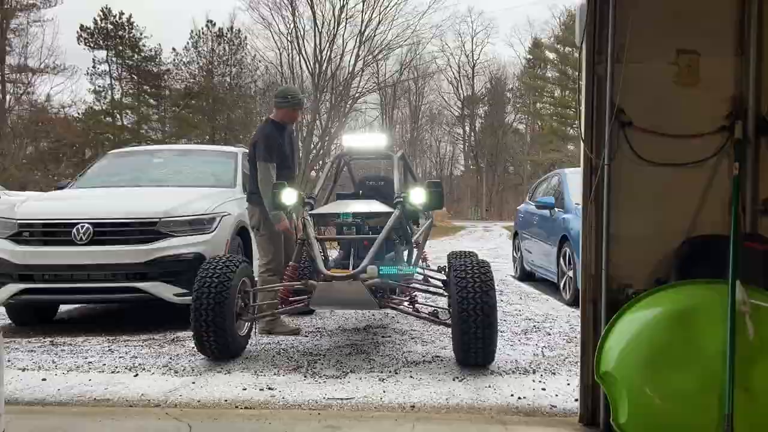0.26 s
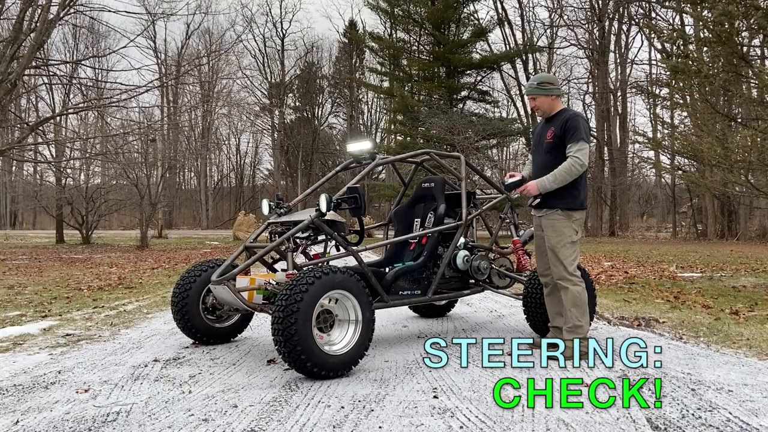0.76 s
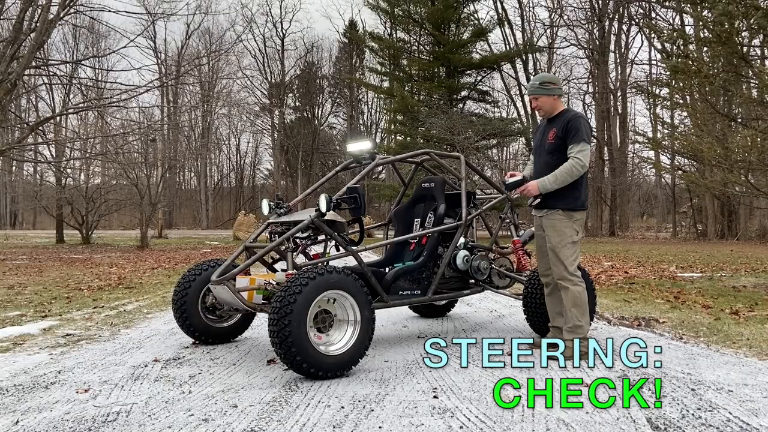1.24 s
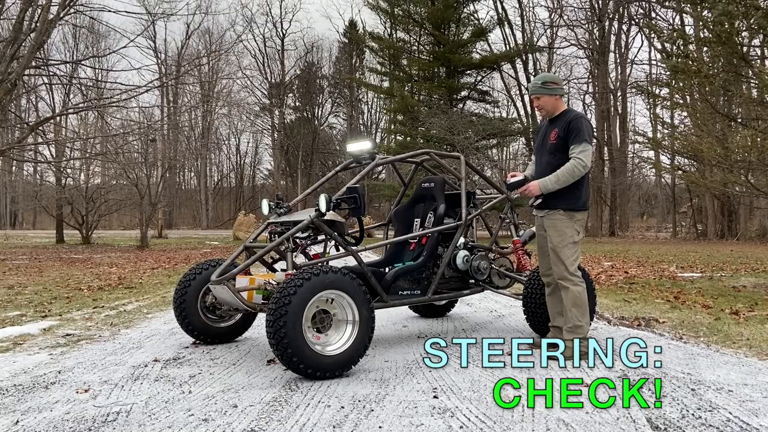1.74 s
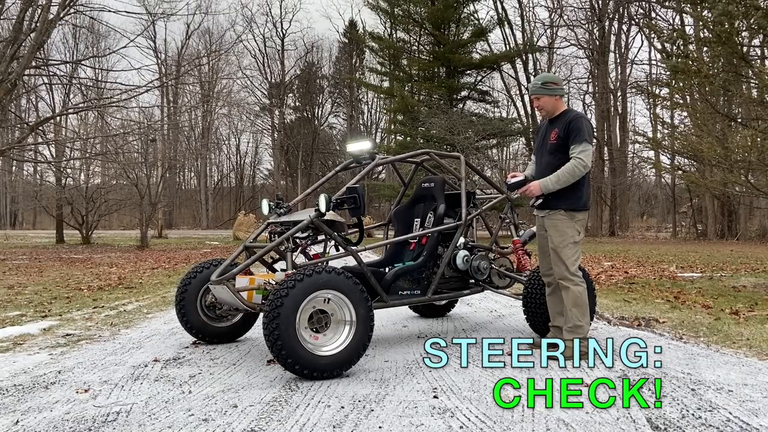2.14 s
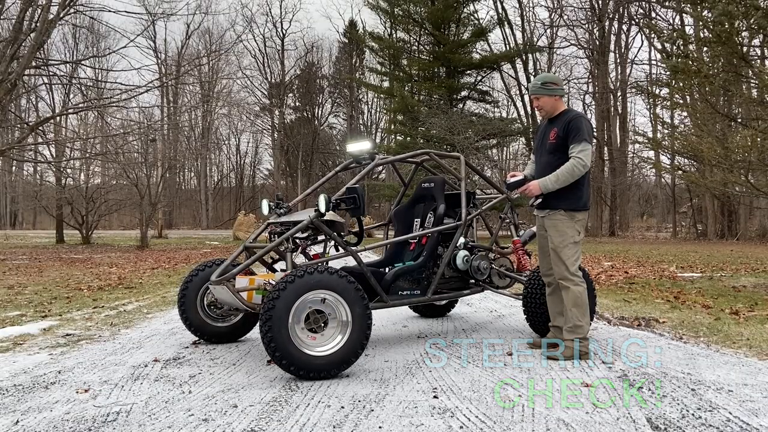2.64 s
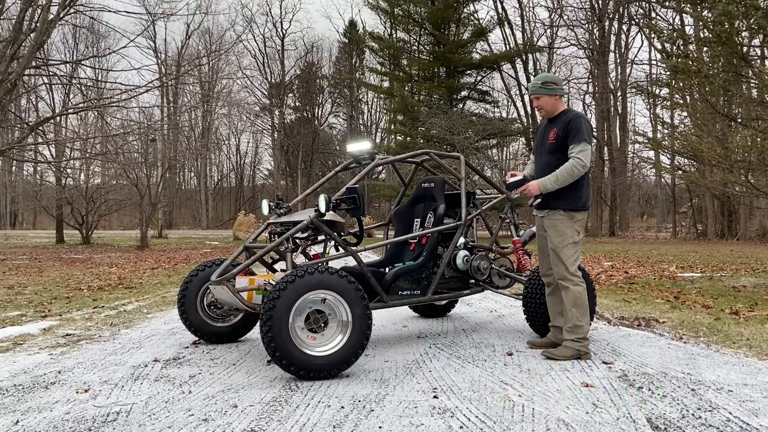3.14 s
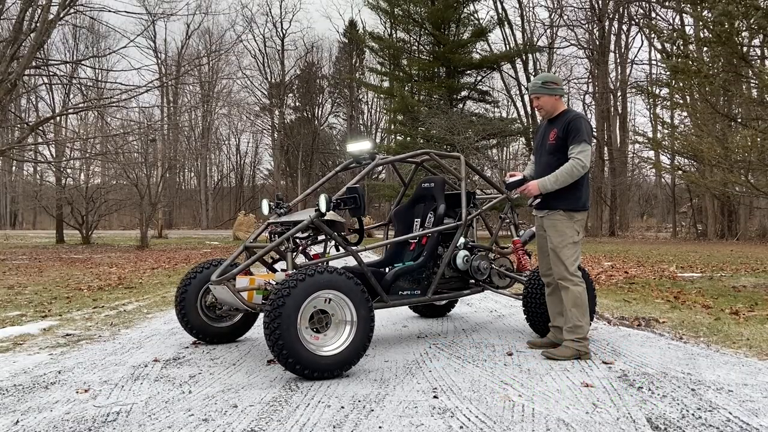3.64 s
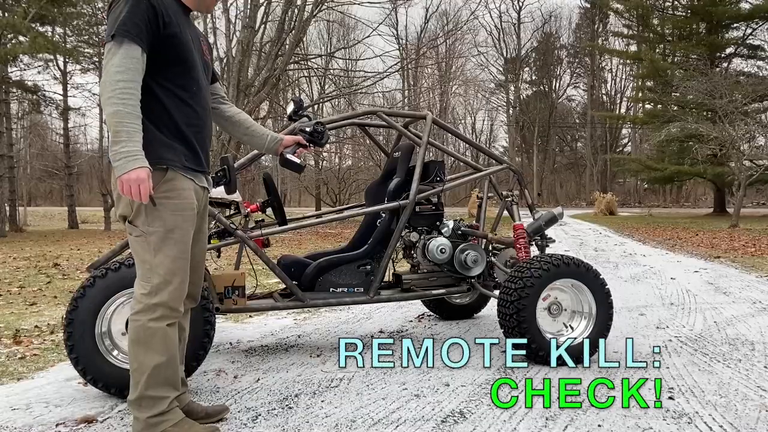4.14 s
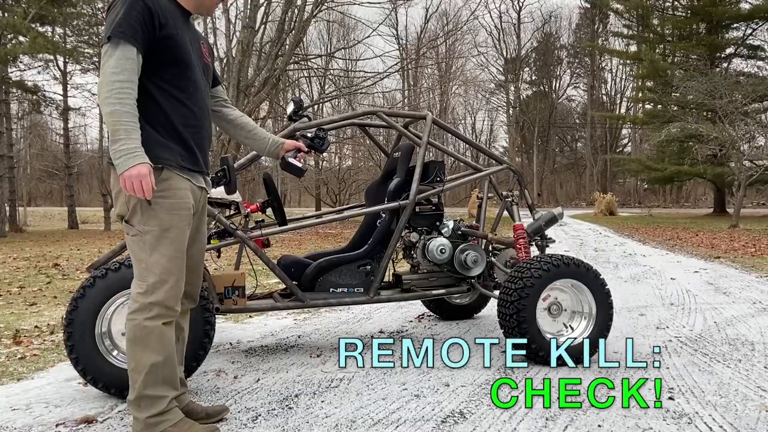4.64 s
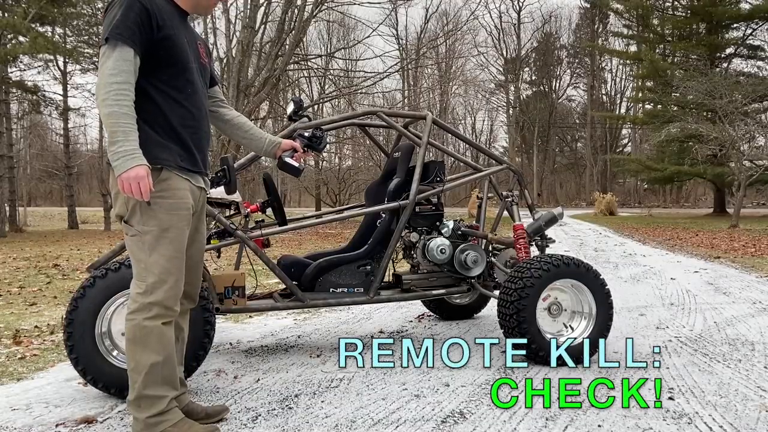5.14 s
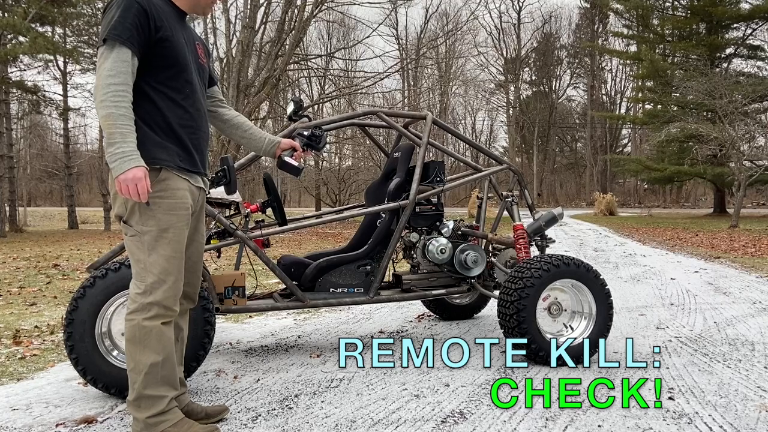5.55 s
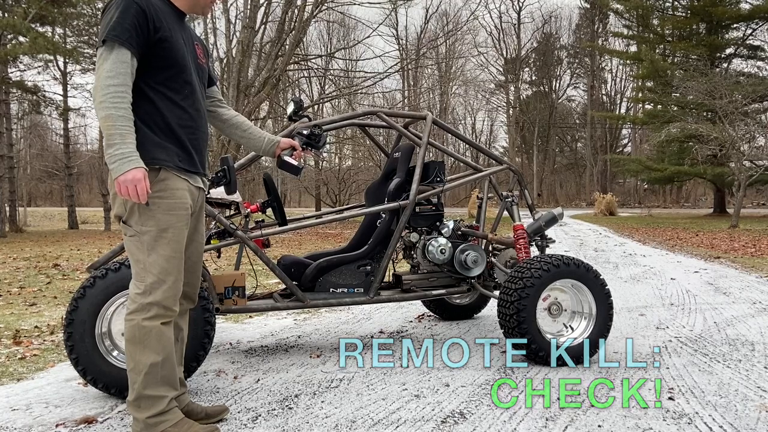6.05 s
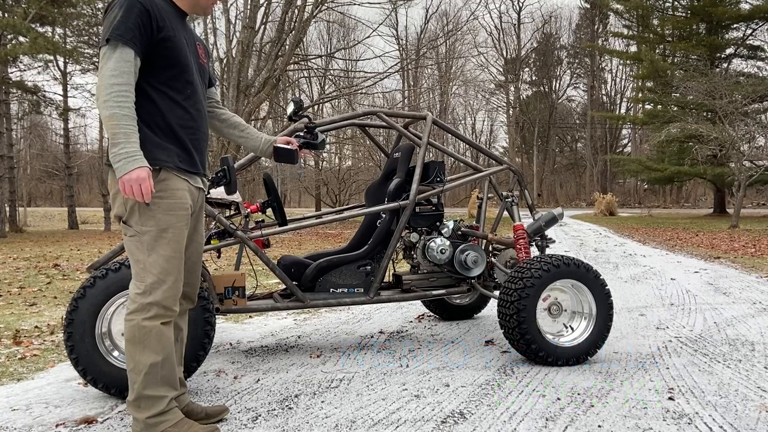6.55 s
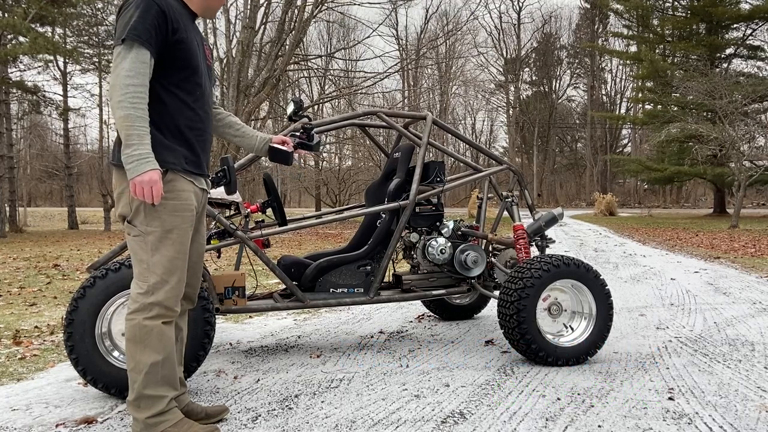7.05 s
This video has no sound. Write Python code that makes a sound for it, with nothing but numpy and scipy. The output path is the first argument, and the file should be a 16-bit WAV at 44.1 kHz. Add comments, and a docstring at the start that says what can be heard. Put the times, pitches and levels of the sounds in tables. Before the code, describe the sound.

Outdoors on a driveway, a small single-cylinder buggy engine idles evenly, low muffled exhaust thumps over ticking valves and fan whir. Thin, wavering electric whines come and go as the wheels are steered. Abruptly the view is nearer and wind rumbles and flutters heavily on the stereo microphone. The ignition is cut; the engine chuffs ever slower with airy bursts and metallic clacks, sighs faintly and stops, leaving popping gusts.

```python
"""Outdoors, a single-cylinder four-stroke buggy idles: each firing thumps through silencer resonances, short
rings make the valve clatter, shaped noise the whir and hiss of the fan, wavering partials the steering motor.
The scene cuts to a nearer, windy place: rumble, flutter and popping eddies buffet two microphone ports.
The ignition is cut and the engine chuffs ever slower to a halt, in bursts of resonant noise and clacks."""
import sys
import numpy as np
from scipy import signal
from scipy.fft import rfft, irfft
from scipy.io import wavfile
from scipy.ndimage import uniform_filter1d

SR = 44100
rng = np.random.default_rng(int(sys.argv[2]) if len(sys.argv) > 2 else 0)


def dump_mix(stems):
    """Bounce the given channels to the path in sys.argv[1] as a 16-bit WAV at rate SR."""
    frames = np.atleast_2d(stems).T  # one column per channel
    limited = np.clip(frames, -1, 1)  # hard clip at full scale
    pcm = np.round(limited * 32767).astype(np.int16)
    wavfile.write(sys.argv[1], SR, pcm)


N = 321489
TIME = np.arange(N) / SR
FREQ = np.maximum(np.arange(N // 2 + 1) * SR / N, 1)


def undb(db):
    """Gain of a level in dB."""
    return 10 ** (np.asarray(db) / 20)


def unit(x):
    """Scale to rms 1."""
    return x / np.sqrt(np.mean(x ** 2))


def curves(table):
    """Columns of a table, joined in time by straight lines."""
    time_s, *columns = np.transpose(table)
    return [np.interp(TIME, time_s, column) for column in columns]


def colour(x, points):
    """Shape a spectrum by (hz, db) points; outside them it falls 17.2 dB an octave."""
    hz, db = np.transpose(points)
    octaves_below = np.maximum(np.log2(hz[0] / FREQ), 0)
    octaves_above = np.maximum(np.log2(FREQ / hz[-1]), 0)
    shape_db = np.interp(np.log(FREQ), np.log(hz), db) - 17.2 * (octaves_below + octaves_above)
    return irfft(rfft(x) * undb(shape_db), N)


def ring(x, modes):
    """Pass a sound through a sum of resonances that alternate in sign."""
    response = 0
    for k, (hz, width_hz, db) in enumerate(modes):
        detuning = (FREQ ** 2 - hz ** 2) / (FREQ * width_hz)
        response = response + (-1) ** k * undb(db) / (1 + 1j * detuning)
    return irfft(rfft(x) * response, N)


def walk(rate):
    """Random levels held for 1 / rate s and smoothed twice; spread near 1."""
    hold = int(SR / rate)
    steps = np.repeat(rng.standard_normal(N // hold + 1), hold)
    return 1.1204 * uniform_filter1d(uniform_filter1d(steps, hold), hold)[:N]


def eddies(points, shared, lumpy_db, rate):
    """Turbulence in lumps: a share of the power is common to both ports, the rest is each port's own."""
    common, left, right = (colour(rng.standard_normal(N) * undb(lumpy_db * walk(rate)), points)
                           for _ in range(3))
    shared = np.clip(shared, 0, 1)
    return unit(np.sqrt(shared) * common + np.sqrt(1 - shared) * np.array([left, right]))


# Spectrum of the quiet air: pitch_hz, relative_density_db
AIR_SPECTRUM = [(40, -7), (65, -4), (180, 2), (600, -20.5), (950, -22.5), (1500, -26.5), (2500, -31.5),
                (3300, -39.5), (9000, -66.5)]
AIR_DB = -34  # rms


def quiet_air():
    """A faint bed of nearly steady noise, almost independent at the two ports."""
    return undb(AIR_DB) * eddies(AIR_SPECTRUM, 0.067, 0.5, 7.6)


# Wind on the ports, from its first row on: time_s, rumble_db, flutter_db
WIND_LEVELS = [(3.82, -18, -41), (3.9, -13.5, -22), (4.25, -11, -18.5), (4.55, -15, -21.5),
               (5.17, -13.5, -22), (5.25, -30, -24.5), (5.47, -37, -33), (5.6, -28.5, -25),
               (5.79, -30, -28), (5.85, -22, -21.5), (6.22, -26, -28), (6.45, -27.5, -34), (6.58, -40, -40),
               (6.63, -28, -20.5), (6.71, -36.5, -53), (6.79, -35, -15), (6.9, -32, -54), (7.0, -50, -60),
               (7.08, -35, -36), (7.19, -44, -45), (7.29, -48, -66)]
# Spectrum of the rumble: pitch_hz, relative_density_db
RUMBLE_SPECTRUM = [(25, -32), (45, -5), (65, -1), (110, -5), (200, -19), (300, -20.5)]
# Spectrum of the flutter: pitch_hz, relative_density_db
FLUTTER_SPECTRUM = [(120, 3), (220, 1), (400, -2), (700, -12), (1100, -23), (1600, -30)]
# Loudest eddies, sharp pops and slow thuds: start_s, level_db, pitch_hz, left_minus_right_db
LOUD_POPS = [(3.944, -10, 324, -10), (4.035, -7, 440, -12.5), (4.163, -5, 260, -5.5), (4.334, -3, 400, -4),
             (4.426, 0.5, 288, -2), (4.643, -4.5, 236, -7), (4.84, -8, 245, -15), (4.902, -9.5, 375, -18),
             (5.044, -9.5, 365, -13), (5.201, -6.5, 279, -1), (5.418, -15, 330, -2), (5.516, -14, 242, -6),
             (5.553, -16, 108, 2.5), (5.557, -19, 270, 0.0), (5.686, -8.5, 264, -3.0),
             (5.689, -11, 104, -2), (5.769, -14, 304, -2), (5.829, -10.5, 282, -9), (5.831, -8.5, 91, -1.0),
             (5.904, -15, 345, -5), (5.958, -6.5, 450, -7), (6.077, -10, 113, 5), (6.084, -11, 262, -1.0),
             (6.172, -9.5, 86, 4), (6.177, -14, 460, -1.0), (6.21, -8.5, 370, 5), (6.222, -9.5, 442, -9),
             (6.246, -6.5, 347, 4), (6.276, -17, 272, 2), (6.301, -9, 655, -9), (6.35, -13, 75, 1),
             (6.397, -13, 252, 7), (6.417, -9, 430, -8.5), (6.466, -24.5, 603, -1), (6.503, -22.5, 500, -6),
             (6.613, -12, 244, -2.5), (6.624, -18.5, 74, -1.5), (6.636, -6.5, 260, -3),
             (6.687, -11, 373, -8), (6.785, -20, 246, -4.0), (6.803, -17, 324, -6), (6.834, -25, 403, -9),
             (6.871, -26, 510, -11), (6.872, -27, 108, 6), (6.973, -21, 441, -4), (7.054, -18.5, 325, -7),
             (7.06, -15, 62, 3), (7.117, -13, 480, -9), (7.126, -9, 68.5, 1.5), (7.131, -11, 320, -6)]
GUSTY_DB, GUSTS_PER_S = 1.5, 12
# small random pops: most dB over the flutter, lowest Hz, octaves of spread, mean left minus right dB
SMALL_DB, SMALL_HZ, SMALL_OCTAVES, SMALL_PAN_DB = 10.5, 265, 1.3, -15


def wind():
    """Turbulent rumble and flutter follow the gusts; the strongest eddies pop as a cycle or two."""
    gusts_db = GUSTY_DB * np.array([walk(GUSTS_PER_S), walk(GUSTS_PER_S)])
    rumble_db, flutter_db = curves(WIND_LEVELS) + gusts_db
    out = undb(rumble_db) * eddies(RUMBLE_SPECTRUM, 0.78, 2.8, 25)
    out = out + undb(flutter_db) * eddies(FLUTTER_SPECTRUM, 0.43, 7.4, 150)
    onset_s = WIND_LEVELS[0][0]
    out = out * np.clip((TIME - onset_s) / 0.056, 0, 1)

    when, size, pitch, side = rng.random(size=(70, 4)).T
    small_s = onset_s + when * (TIME[-1] - onset_s)
    small_db = flutter_db[(small_s * SR).astype(int)] + SMALL_DB - 8 * size
    small_hz = SMALL_HZ * 2 ** (SMALL_OCTAVES * pitch)
    small_pops = list(zip(small_s, small_db, small_hz, 2 * SMALL_PAN_DB * side))
    for start_s, db, hz, pan_db in LOUD_POPS + small_pops:
        i = int(start_s * SR)
        turns = (TIME[i:i + SR // 10] - start_s) * hz
        body = (turns / 0.91 * np.exp(1 - turns / 0.75)) ** 2
        front = 0.3 * turns / 0.36 * np.exp(1 - turns / 0.32)  # higher and sharper
        pop = body * np.sin(2 * np.pi * turns) + front * np.sin(2 * np.pi * 1.93 * turns)
        out[:, i:i + len(pop)] -= undb(db + np.array([[pan_db], [-pan_db]]) / 2) * pop
    return out


# Steering motor, a row a turn of the wheels; pitches are of the second partial:
# start_s, length_s, start_hz, top_hz, end_hz, second_partial_db, third_partial_db
WHEEL_TURNS = [(0.169, .3, 2380, 2920, 2800, -55, -65), (0.911, .25, 2600, 2990, 3120, -49, -75),
               (1.659, 0.36, 2680, 2800, 2670, -51, -57), (2.082, .36, 2680, 2615, 2620, -48, -57.5),
               (2.48, 0.19, 2554, 2620, 2600, -51, -57.5), (3.55, .24, 3070, 3030, 3040, -55, -75)]
SPIN_UP_S, SPIN_UP_DB = 0.058, 3  # time to the top pitch; extra level at the start
WAVER_SHARE, WAVER_DB = .011, 5.5  # unsteadiness of pitch and of level


def steering_whine():
    """A thin, unsteady pair of partials: the motor strains as it spins up, then drifts under load."""
    out = 0
    for start_s, length_s, start_hz, top_hz, end_hz, second_db, third_db in WHEEL_TURNS:
        since = TIME - start_s
        hz = np.interp(since, [0, SPIN_UP_S, length_s], [start_hz, top_hz, end_hz])
        on = np.clip(np.minimum(since, length_s - since) / 0.012, 0, 1)
        phase = np.pi * np.cumsum(hz * (1 + WAVER_SHARE * walk(30))) / SR  # of the first partial
        strain_db = SPIN_UP_DB * np.exp(-(since / SPIN_UP_S) ** 2)
        for k, db in ((2, second_db), (3, third_db)):
            level = np.sqrt(2) * undb(db + strain_db + WAVER_DB * walk(30.13))
            out = out + on * level * np.sin(k * phase)
    return out


# Crank while the ignition is on, hunting a little; the scene cuts mid-cycle to a nearer, windy place:
# time_s, four_stroke_cycles_done
CRANK_TURNS = [(-.0539, 0), (.8858, 14), (1.4191, 22), (2.2225, 34), (2.8898, 44), (3.7643, 57),
               (3.7995, 58), (4.312, 66)]
# after the ignition cut: starting cycles/s, friction in cycles/s per s, drag as share of the speed per s
CUT_HZ, FRICTION, DRAG = 15.61, 3.4, .2788


def crank():
    """Times and cycles done: the idle, then friction and drag slow the crank after the ignition cut."""
    time_s, cycles = np.transpose(CRANK_TURNS)
    t = np.arange(1, 2900) / 1000
    done = (CUT_HZ + FRICTION / DRAG) * (1 - np.exp(-DRAG * t)) / DRAG - FRICTION / DRAG * t
    return np.append(time_s, time_s[-1] + t), np.append(cycles, cycles[-1] + done)


# Running gear: time_s, clatter_db, hiss_db
GEAR_LEVELS = [(0, -35, -48), (1.9, -34.5, -47), (3.78, -35, -47.5), (3.81, -32, -42.5), (4.3, -31, -43.5),
               (4.55, -35, -46), (5.55, -36, -45.5), (5.85, -41.5, -54), (6.45, -53, -62.5),
               (6.55, -60.5, -66.5), (6.85, -66, -61), (6.95, -72, -92)]
# Knocks that ring the block in every cycle: cycle_share, relative_db, pitch_hz, t60_s
VALVE_KNOCKS = [(0.22, 7.5, 675, 0.017), (0.32, 1, 657, 0.018), (0.91, -2, 590, 0.026),
                (0.171, 3, 1044, 0.018), (.28, -0.5, 1340, 0.016), (.63, -19.5, 1195, 0.023),
                (0.78, 0, 1312, 0.032), (0.19, 4.5, 1990, 0.015), (.24, 7, 1815, 0.014),
                (.3, 2.5, 1705, 0.032), (.65, -1, 1807, 0.063), (.75, -4, 1655, 0.044),
                (0.8, -2, 1760, 0.037), (0.87, 5.5, 1870, 0.012), (.21, -0.5, 2550, 0.028),
                (0.51, -3.5, 2060, 0.03), (.64, 0.5, 3100, 0.012), (0.66, -6.5, 3330, 0.034),
                (.63, -11.5, 2500, 0.035)]
# Knocks that stand out after the scene cut, by row of VALVE_KNOCKS: row, extra_db
NEARER_KNOCKS = {8: 2, 10: 8, 18: 13}
# Resonances of the block: pitch_hz, width_hz, relative_db
BLOCK_MODES = [(1085, 110, -7.5), (1390, 16.67, -2), (1716, 14, 4.5), (1853, 19, 1.5), (2517, 194, -8.5),
               (3412, 38, 1)]
# Spectrum of the whir: pitch_hz, relative_density_db
WHIR_SPECTRUM = [(450, 1.5), (900, -9), (1600, -1.5), (2500, -9), (3300, -12), (3700, -30)]
# Spectrum of the hiss: pitch_hz, relative_density_db
HISS_SPECTRUM = [(3700, 0.5), (5500, -1), (6900, 0), (8500, -5), (12000, -11.5), (15000, -9)]
# Puffs that lift the hiss in every cycle: cycle_share, over_hiss_db, fade_cycle_share
HISS_PUFFS = [(.905, 1.5, 0.091), (.13, -0.5, 0.078), (0.22, -1, 0.28), (0.23, -15, 0.36),
              (0.99, -21, 0.036)]
PULSE_DB, PULSE_SHARE = 1, 0.27  # the whir swells twice a cycle, first at this share


def gear():
    """Valve gear knocks at fixed points of the cycle in short rings; the fan whirs and hisses through."""
    clatter_db, hiss_db = curves(GEAR_LEVELS)
    time_s, cycles = crank()
    knocks, t = np.zeros(N + SR), np.arange(SR // 30) / SR
    scene_cut_s = CRANK_TURNS[-2][0]
    for row, (share, db, hz, t60) in enumerate(VALVE_KNOCKS):
        starts = np.interp(np.arange(86) + share, cycles, time_s)
        for start, (strong, sharp) in zip(starts, rng.standard_normal((86, 2))):
            i = int((start + .1) * SR)  # 0.1 s of lead-in, trimmed below
            knock_db = db + NEARER_KNOCKS.get(row, 0) * (start > scene_cut_s) + 2.0 * strong
            fall = undb(knock_db - 60 * t / t60) * np.clip(t / 0.0006, 0, 1)
            knocks[i:i + len(t)] += fall * np.sin(2 * np.pi * hz * (1 + 0.031 * sharp) * t)
    knocks = knocks[SR // 10:SR // 10 + N]

    done = np.interp(TIME, time_s, cycles)
    pulse_db = PULSE_DB * np.cos(4 * np.pi * (done - PULSE_SHARE))
    whir = rng.standard_normal(N) * undb(0.79 * walk(22) + pulse_db)
    clatter = unit(knocks) + undb(3.0) * unit(colour(whir, WHIR_SPECTRUM))
    clatter = clatter + undb(-7.5) * unit(ring(whir, BLOCK_MODES))

    lift = 1
    for share, db, fade in HISS_PUFFS:
        since = done - share + 1
        puff_levels = undb(db + 4.5 * rng.standard_normal(90))  # one a cycle
        lift = lift + puff_levels[since.astype(int)] * np.exp(-(since % 1) / fade)
    hiss = lift * colour(rng.standard_normal(N), HISS_SPECTRUM)
    return undb(clatter_db) * unit(clatter) + undb(hiss_db) * unit(hiss)


# Valves snapping as the engine runs down: start_s, air_burst_db, clack_over_burst_db
VALVE_SNAPS = [(4.3225, -39.5, 1), (4.374, -27.5, -7), (4.4411, -32.5, -4), (4.51, -33, -5),
               (4.58, -33.5, -5), (4.655, -33.5, -3), (4.7331, -34.5, -6), (4.7568, -44, 4),
               (4.8137, -34, -4), (4.899, -37, -12), (4.9682, -43.5, 17), (4.9896, -45, -8),
               (5.0637, -35.5, 6.5), (5.1633, -33, 8), (5.2737, -33, 4), (5.3893, -33, 4.5),
               (5.5149, -33, 4.5), (5.6174, -34, -2.5), (5.725, -57, 18), (5.7638, -44, -12),
               (5.831, -42.5, -7), (5.874, -56, 13), (5.9257, -44, 6), (5.9508, -39.5, 4), (6.005, -45, -7),
               (6.056, -61.5, 23), (6.116, -44, 3), (6.1434, -38.5, 3.5), (6.2126, -45.5, -12),
               (6.2764, -62, 21.5), (6.357, -44, 4), (6.3957, -44, 4.5), (6.595, -65, 23),
               (6.7268, -43, 4.5), (6.805, -47, 0)]
# Rings of the casing in each clack: pitch_hz, relative_db, t60_s
CLACK_RINGS = [(1105, 7, 0.057), (1468, 10, 0.032), (1930, 1, 0.062), (2950, 2, 0.054), (3260, 4, 0.027),
               (4770, -5, 0.043)]
# One longer ring of the casing: start_s, pitch_hz, level_db, t60_s
CASING_PING = (4.976, 2960, -28, .15)
# Long sighs of air past the slowing piston: start_s, length_s, level_db, low_part_over_it_db
PISTON_SIGHS = [(5.626, 0.031, -31, 4), (5.765, 0.047, -34, 2.5), (5.929, 0.054, -41.5, 7),
                (6.121, 0.059, -45.5, 10.5), (6.323, 0.13, -51, 7), (6.457, 0.059, -51, -3),
                (6.652, .08, -57, 2), (6.779, 0.062, -60, 11.5)]
# High resonances of the intake: pitch_hz, width_hz, relative_db
INTAKE_HIGH = [(4620, 390, -1.5), (6710, 830, -2.5), (8200, 940, -1.5), (12100, 1700, -8)]
# Low resonances of the intake: pitch_hz, width_hz, relative_db
INTAKE_LOW = [(1030, 126, -1.5), (1430, 320, 4.5), (2010, 140, 1.5), (2460, 320, 0.5), (3044, 114, 5.5),
              (3460, 590, -1.5)]
SNAP_T60_S = 0.049


def rundown():
    """Snaps burst as air noise and clack the casing; sighs swell and fade in the same intake resonances."""
    high, low, clack = np.zeros((3, N))
    chance = rng.standard_normal((len(VALVE_SNAPS), len(CLACK_RINGS)))
    for (start_s, db, clack_db), uneven in zip(VALVE_SNAPS, chance):
        i = int(start_s * SR)
        t = TIME[i:i + SR // 8] - start_s
        burst_db = db - 60 * np.maximum(t - .006, 0) / SNAP_T60_S  # holds, then fades
        burst = undb(burst_db) * np.clip(t / 0.00044, 0, 1)
        high[i:i + len(t)] += burst
        low[i:i + len(t)] += burst * undb(clack_db - 3)  # the clack's air is set 3 dB down
        for (hz, own_db, t60), u in zip(CLACK_RINGS, uneven):
            ring_db = db + clack_db + own_db + 2.8 * u
            fall = undb(ring_db - 60 * t / t60) * np.clip(t / 0.0061, 0, 1)
            clack[i:i + len(t)] += fall * np.sin(2 * np.pi * hz * (1 + 0.0083 * u) * t)

    start_s, hz, db, t60 = CASING_PING
    t = np.maximum(TIME - start_s, 0)
    clack += undb(db - 60 * t / t60) * np.clip(t / 0.0041, 0, 1) * np.sin(2 * np.pi * hz * t)

    for start_s, length_s, db, low_db in PISTON_SIGHS:
        swell = undb(db) * np.sin(np.pi * np.clip((TIME - start_s) / length_s, 0, 1))
        high, low = high + swell, low + swell * undb(low_db)
    high_air = high * unit(ring(rng.standard_normal(N), INTAKE_HIGH))
    low_air = low * unit(ring(rng.standard_normal(N), INTAKE_LOW))
    return clack + high_air + low_air


# Exhaust strength: time_s, relative_db
EXHAUST_LEVELS = [(0, 0), (3.7, 0.5), (3.8, 2.5), (4.1, 0), (4.5, 2.5), (5.11, -0.5), (5.2, -11.5),
                  (5.3, -15), (6.3, -29), (6.9, -77)]
# Silencer modes: pitch_hz, width_hz, envelope_peak_db
SILENCER_MODES = [(67.7, 37.8, -18), (106, 74, -17), (147, 95, -5), (216.6, 55.7, -11.5),
                  (298, 88.5, -15.5), (395, 60.5, -24)]
# How each silencer mode starts: sign (1 a push, -1 a pull)
MODE_SIGNS = [-1, 1, -1, -1, 1, 1]


def exhaust():
    """Each cycle's pulse swells through three chambers in series: every mode rises as t squared, then dies."""
    time_s, cycles = crank()
    starts = np.interp(np.arange(86), cycles, time_s)
    chance = rng.standard_normal((len(starts), 2 + len(SILENCER_MODES)))
    out, t = np.zeros(N + SR), np.arange(SR // 8) / SR
    for start, (late, strong, *uneven) in zip(starts, chance):
        i = int((start + .0002 * late + .1) * SR)  # 0.1 s of lead-in, trimmed below
        for (hz, width_hz, db), sign, own in zip(SILENCER_MODES, MODE_SIGNS, uneven):
            u = np.pi * width_hz * t / 2
            swell = undb(db + 0.65 * strong + 0.28 * own) * (u * np.exp(1 - u)) ** 2
            out[i:i + len(t)] += sign * swell * np.sin(2 * np.pi * hz * t)
    return out[SR // 10:SR // 10 + N] * undb(curves(EXHAUST_LEVELS)[0])


# Phase between the two ports: pitch_hz, left_lead_radians
PORT_LEAD = [(0, 0), (1460, -.4), (3450, -1.4), (5000, -2.4), (6200, .6), (6890, .6), (8350, 3),
             (9650, 3.2), (11100, 6.2), (13300, 6.3), (14300, 9.4)]
# Level between the two ports: pitch_hz, left_minus_right_db
PORT_TILT = [(300, 0), (700, -2), (3000, -1.5), (5000, -6), (6500, 0)]


def ports(x):
    """The same sound at two ports: apart in phase and shaded in the treble."""
    lead = np.interp(FREQ, *np.transpose(PORT_LEAD))
    tilt_hz, tilt = np.transpose(PORT_TILT)
    tilt_db = np.interp(np.log(FREQ), np.log(tilt_hz), tilt)
    spectrum = rfft(x)
    left = irfft(spectrum * undb(tilt_db / 2) * np.exp(1j * lead), N)
    right = irfft(spectrum * undb(-tilt_db / 2), N)
    return np.array([left, right])


def scatter(x):
    """Surroundings scatter a sound: a different decaying noise tail for each port, t60 0.23 s."""
    t = np.arange(SR // 5) / SR
    tails = rng.standard_normal((2, SR // 5)) * undb(-60 * t / 0.23)
    spread = np.array([signal.fftconvolve(x, tail)[:N] for tail in tails])
    return spread / np.sqrt(np.sum(tails[0] ** 2))


def scene():
    """Engine from one side, some of its clatter scattered by the surroundings, wind and quiet air."""
    clatter = gear() + rundown()
    engine = ports(exhaust() + clatter + steering_whine())
    return engine + undb(-17) * scatter(clatter) + wind() + quiet_air()


TOP_HZ = 15750


def record(dry):
    """Drop the deepest bass, round the loudest peaks and leave nothing above TOP_HZ."""
    low_cut = signal.butter(2, 25, "high", fs=SR, output="sos")
    rounded = 1.117 * np.tanh(signal.sosfilt(low_cut, dry) / 1.147)
    return signal.sosfilt(signal.ellip(12, .2, 90, TOP_HZ, fs=SR, output="sos"), rounded)


dry = scene()
out = record(dry)
dump_mix(out)
```